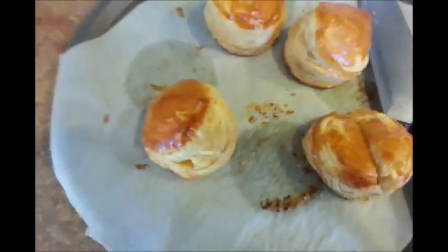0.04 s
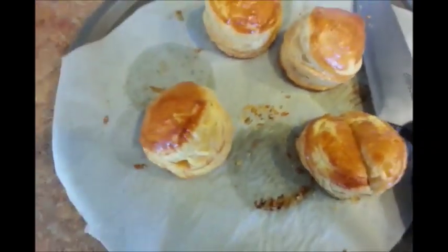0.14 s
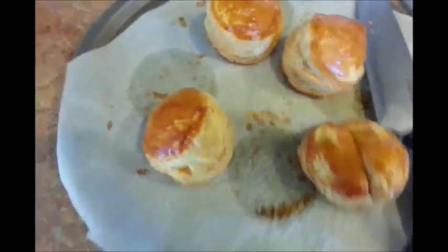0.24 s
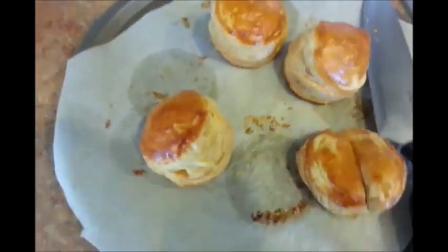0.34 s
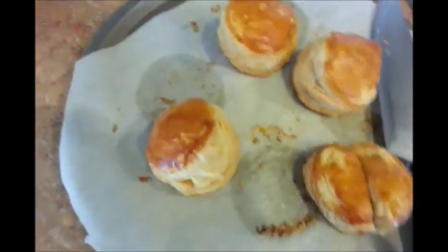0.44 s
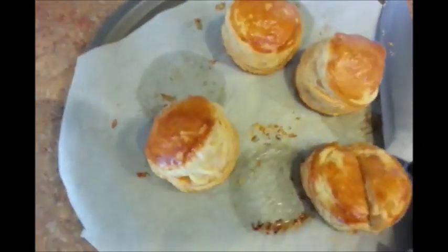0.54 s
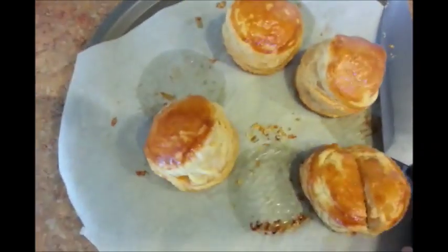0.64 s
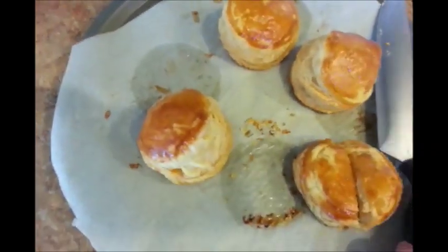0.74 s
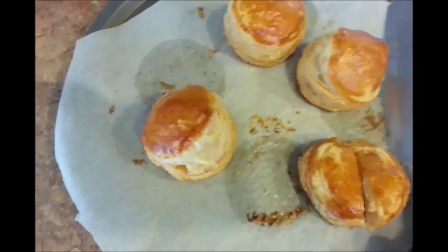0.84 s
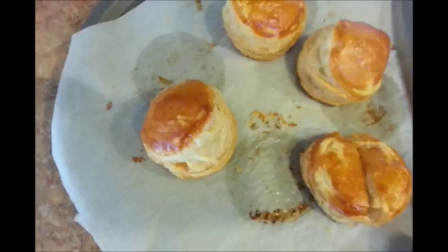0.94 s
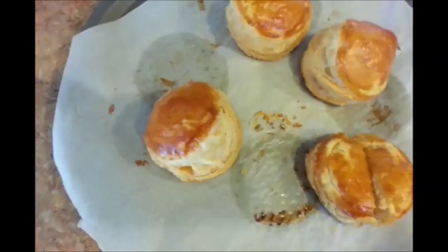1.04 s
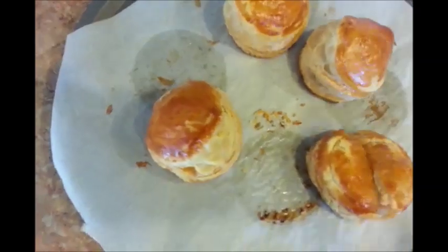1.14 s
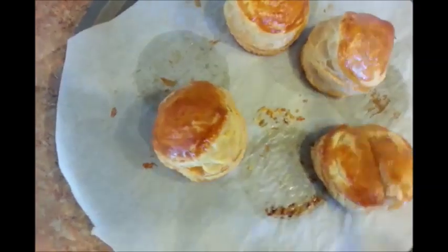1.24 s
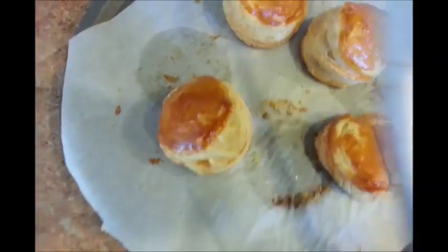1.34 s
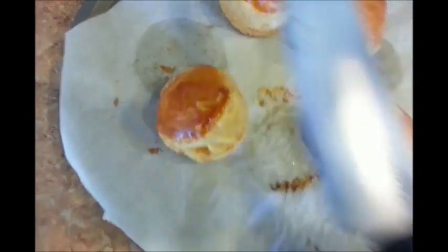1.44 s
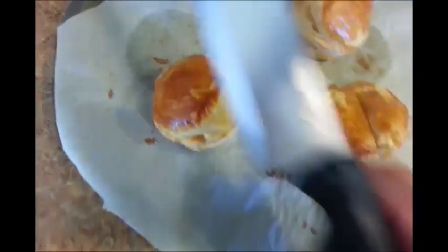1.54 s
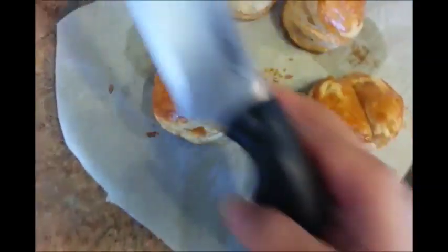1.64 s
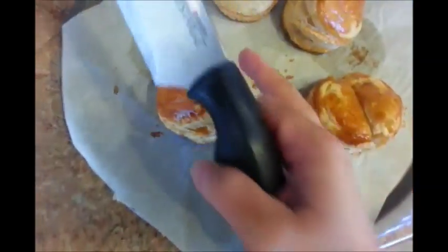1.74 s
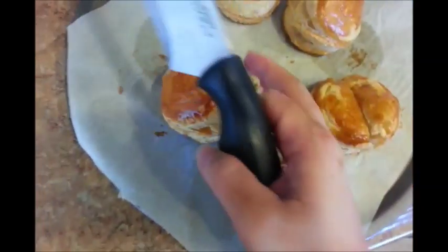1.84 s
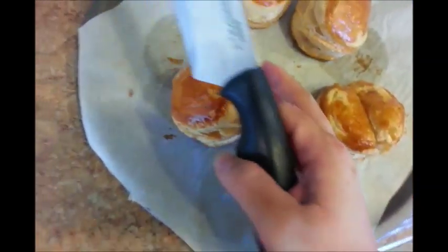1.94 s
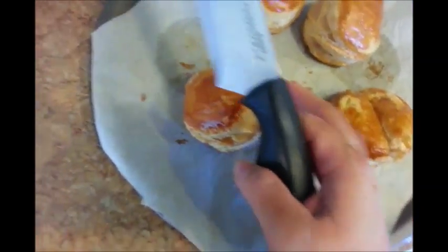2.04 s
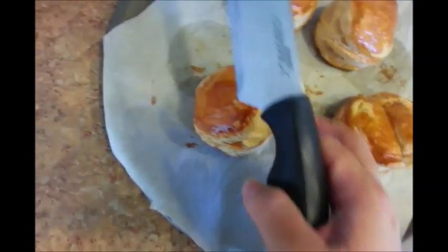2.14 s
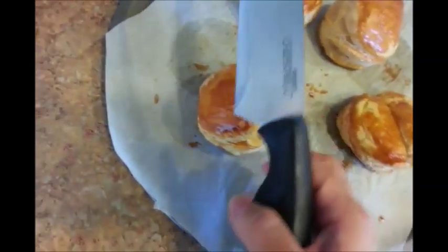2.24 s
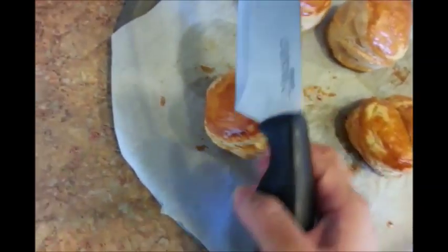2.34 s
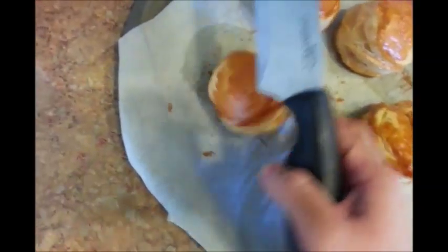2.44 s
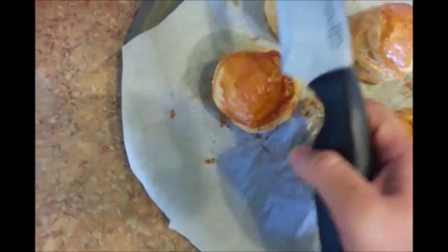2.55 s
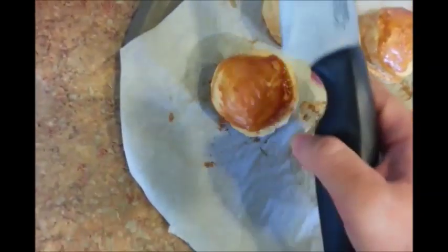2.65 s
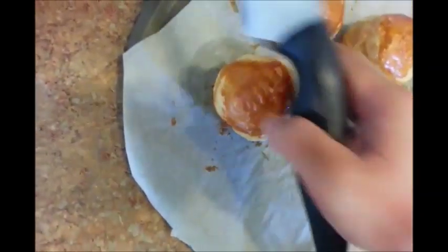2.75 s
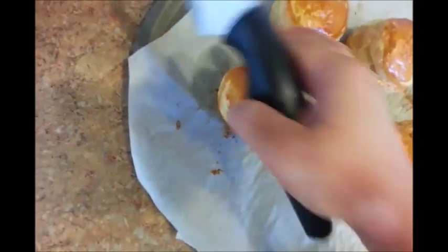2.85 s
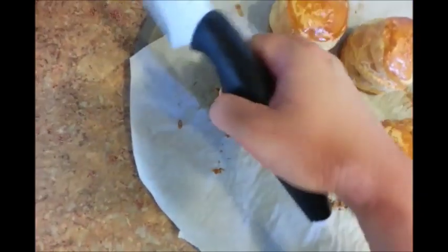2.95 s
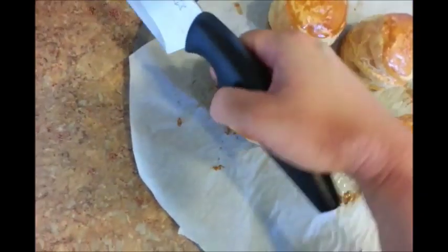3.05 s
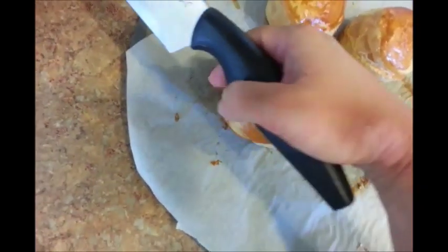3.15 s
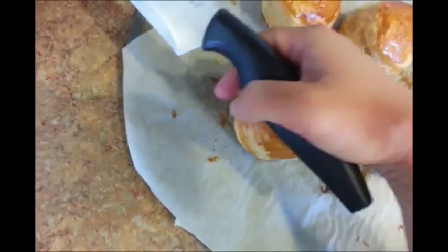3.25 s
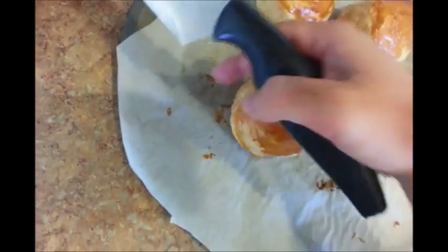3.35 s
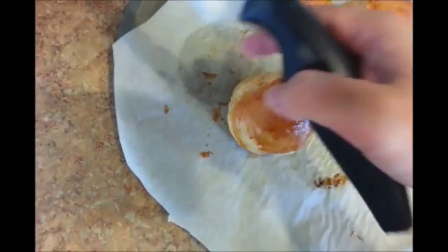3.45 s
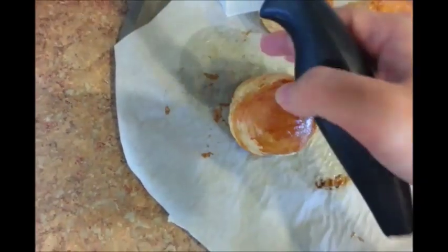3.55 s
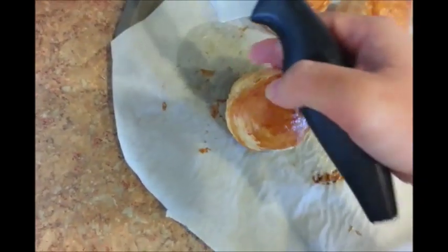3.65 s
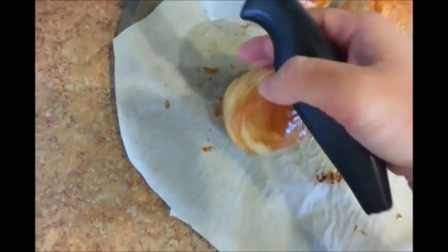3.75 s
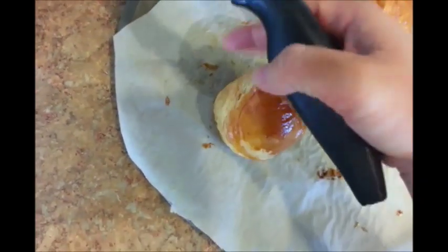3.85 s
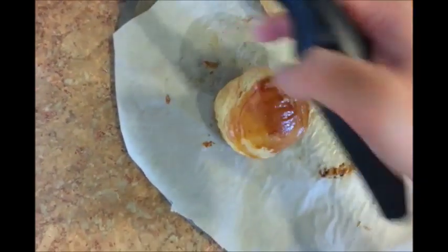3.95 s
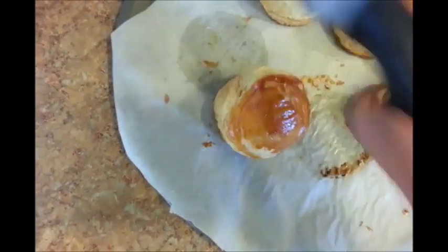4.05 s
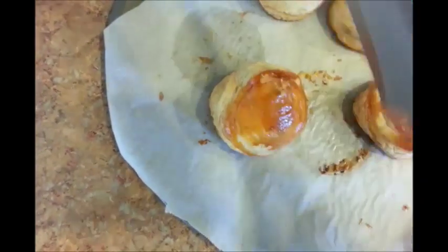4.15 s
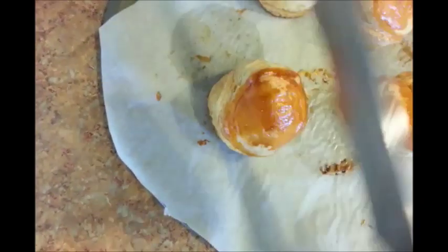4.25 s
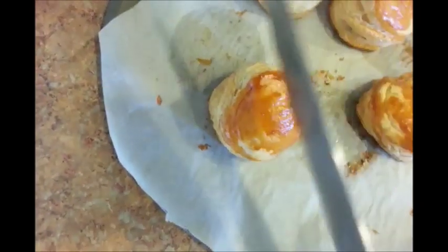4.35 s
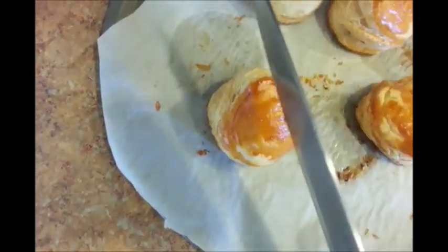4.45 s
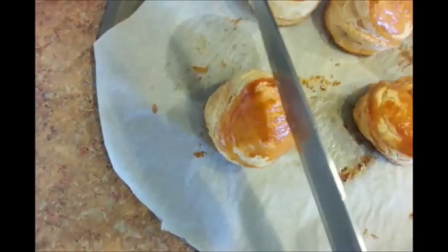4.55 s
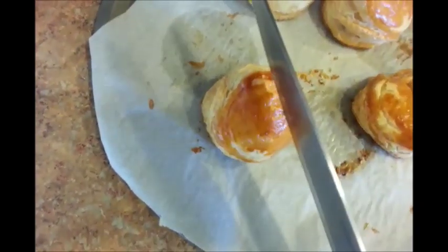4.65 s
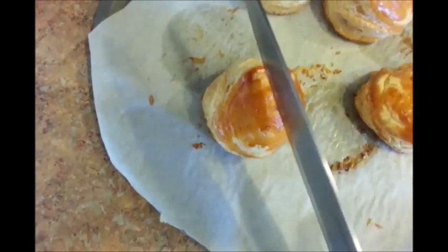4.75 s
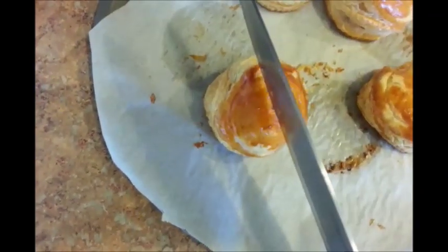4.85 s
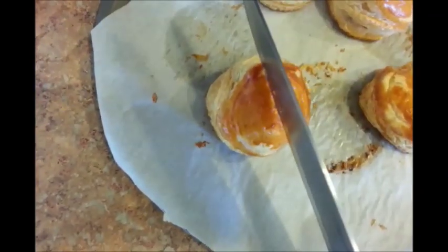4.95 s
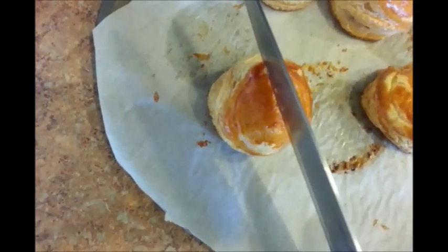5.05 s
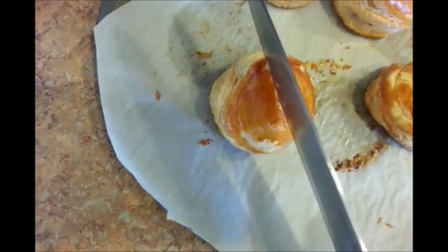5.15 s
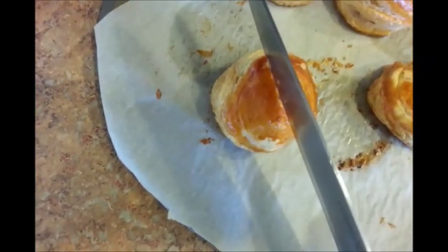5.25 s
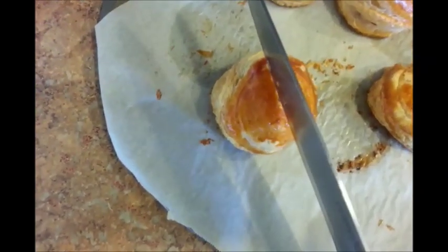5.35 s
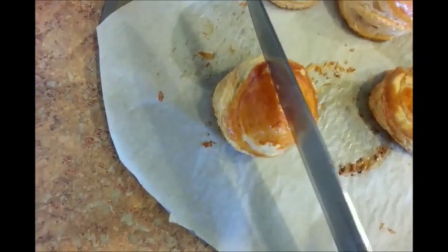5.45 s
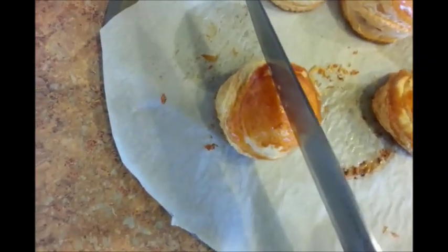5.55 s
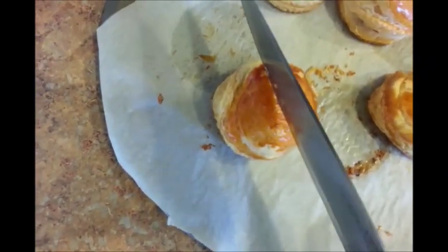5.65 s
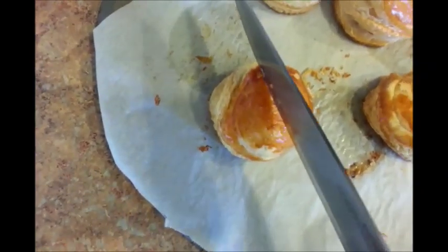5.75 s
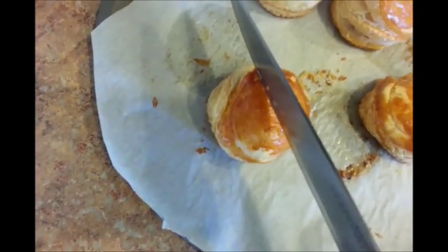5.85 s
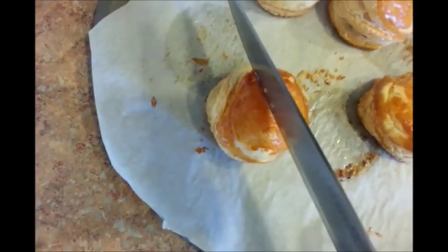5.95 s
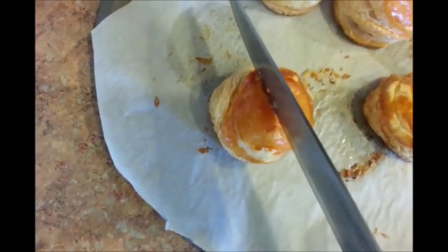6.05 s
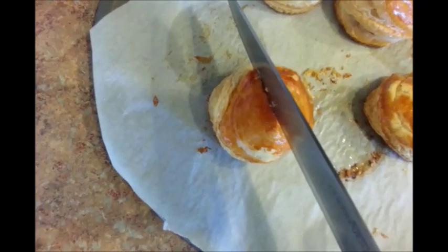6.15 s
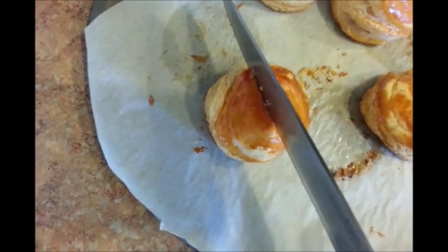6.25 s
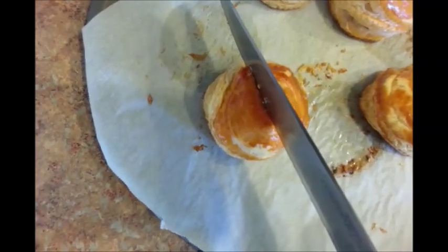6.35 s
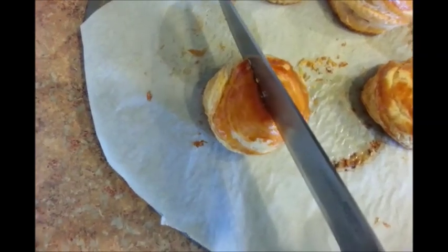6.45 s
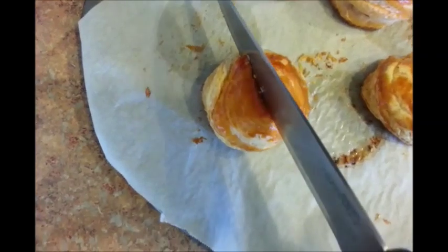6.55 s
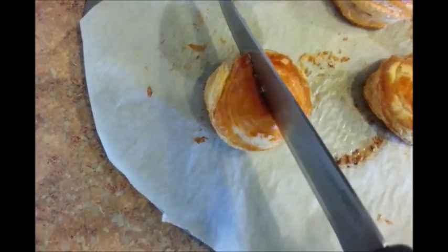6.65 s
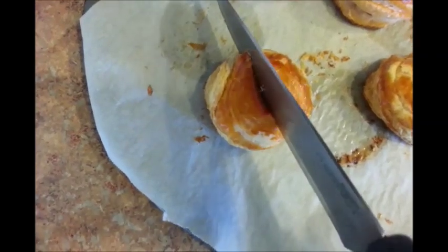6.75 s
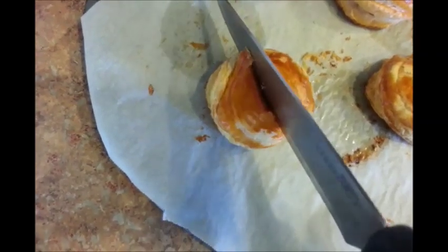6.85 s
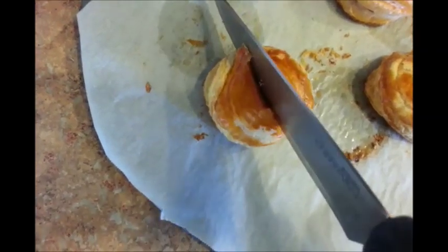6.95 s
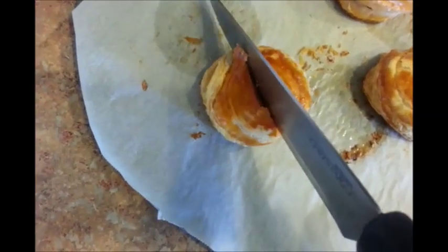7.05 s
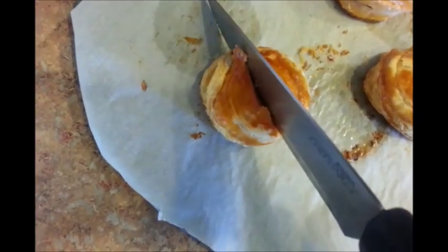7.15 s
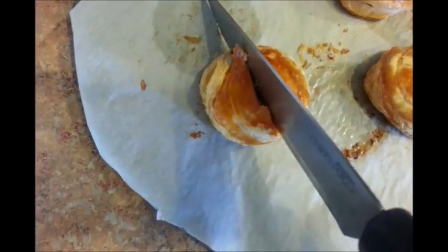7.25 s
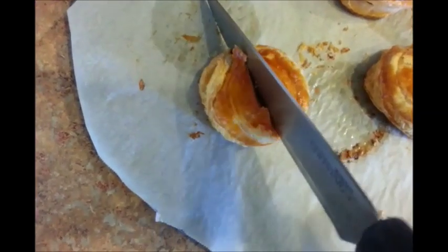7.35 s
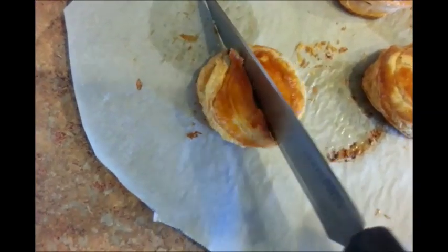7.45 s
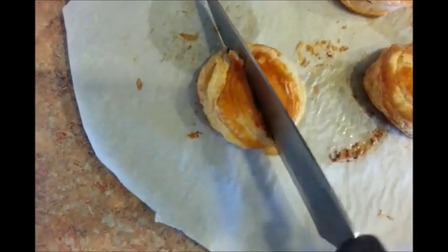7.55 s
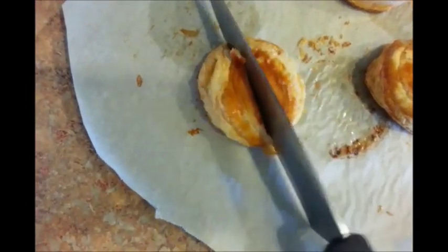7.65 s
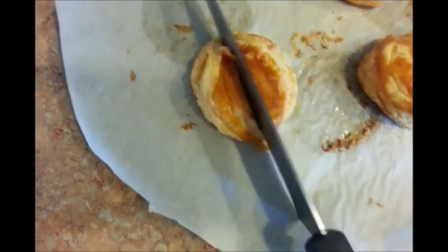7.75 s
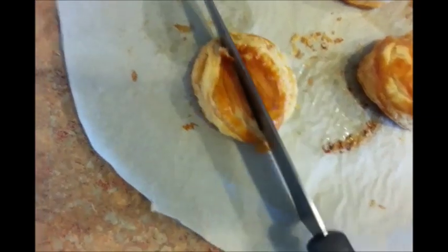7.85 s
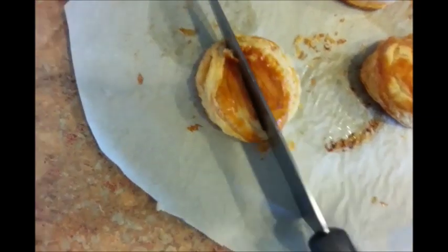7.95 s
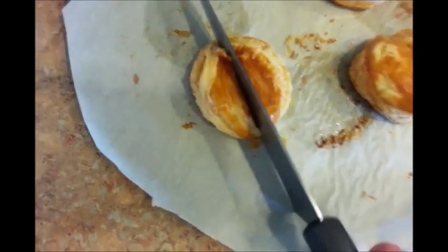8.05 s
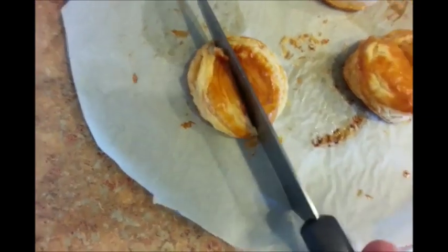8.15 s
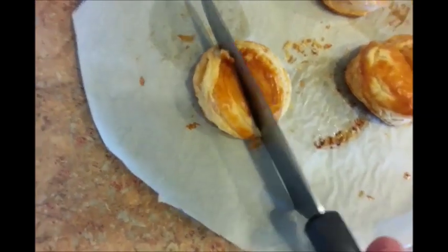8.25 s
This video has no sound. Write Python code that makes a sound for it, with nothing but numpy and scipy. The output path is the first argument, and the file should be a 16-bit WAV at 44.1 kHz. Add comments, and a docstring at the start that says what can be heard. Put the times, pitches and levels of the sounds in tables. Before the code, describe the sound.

Close handheld stereo sound, slightly noisy, with a short room tail. A steady appliance drone runs throughout. Tiny dry ticks and rubs come first, then a soft clink of a knife. A pastry scrapes hissily across crumby paper in three pushes, with a jangling tray rattle on the middle one. Later, fine crackling grows into loud crunches and snapping flakes, with a dull metallic thud as the blade comes through.

```python
"""Cutting puff pastry on a metal tray

In a small kitchen, an appliance hums behind: filtered noise plus a narrow, wavering low tone.
Fingers tick and rub on the camera, a knife is picked up, and a pastry is slid round in three pushes;
the second rattles the tray, whose metal sounds as a noisy clatter plus fading sine tones.
The blade then saws through the crust, made of thousands of tiny filtered clicks and single snaps,
and thumps down on the tray. Reflections and a short room tail follow the sounds on the tray.
"""
import sys
import numpy as np
from scipy import signal
from scipy.fft import rfft, irfft
from scipy.io import wavfile
from scipy.ndimage import uniform_filter1d

SR = 44100
rng = np.random.default_rng(int(sys.argv[2]) if len(sys.argv) > 2 else 0)


def file_out(sig):
    """Save sig as 16-bit WAV at sys.argv[1]."""
    # one column per channel
    cols = np.atleast_2d(sig).T
    # limit, then scale
    lim = np.clip(cols, -1, 1)
    pcm = np.round(lim * 32767).astype(np.int16)
    wavfile.write(sys.argv[1], SR, pcm)


N = 366471  # length in samples


def amp(db):
    """Turns decibels into a gain."""
    return 10 ** (np.asarray(db) / 20)


def unit(x):
    """Scales a signal to an rms of 1."""
    return x / np.sqrt(np.mean(x ** 2) + 1e-20)


def unit_mid(x):
    """Finds the rms of the middle (the left-right average) of a stereo sound."""
    return np.sqrt(np.mean(x.mean(0) ** 2) + 1e-20)


def read(points, hz):
    """Reads a table between its points, along a log-frequency axis."""
    f, value = np.transpose(points)
    return np.interp(np.log(hz + 1), np.log(f), value)


def add(mix, s, sound):
    """Mixes a stereo sound in at time s."""
    part = mix[:, max(round(s * SR), 0):][:, :sound.shape[1]]
    part += sound[:, :part.shape[1]]


def sides(pan_db):
    """Left and right gains whose mean is 1; left is pan_db louder than right."""
    gains = amp([[pan_db], [0]])
    return gains / gains.mean()


def equal_energy(x):
    """Scales each side of a stereo sound to an energy of 1."""
    return x / np.linalg.norm(x, axis=1, keepdims=True)


def bins(size=1024):
    """Frequencies of a short spectrum."""
    return np.fft.rfftfreq(size, 1 / SR)


def impulse(db):
    """The click that has this spectrum and puts its energy as early as possible (minimum phase)."""
    log_gain = np.log(amp(np.r_[db, db[-2:0:-1]]))
    return irfft(np.exp(np.conj(signal.hilbert(log_gain)))[:len(db)])


def flake(spectrum_db, own_db=10, octaves=0.15):
    """One fracture: the material's colour plus a resonance at a random pitch, as if set by its size."""
    own_hz = np.exp(rng.uniform(np.log(1800), np.log(13000)))
    resonance = np.exp(-(np.log2((bins() + 1) / own_hz) / octaves) ** 2)
    click = impulse(spectrum_db + own_db * resonance)
    return click / np.linalg.norm(click)


def tear(tear_s, size=400):
    """A crack runs through a flake: a noise burst that swells and dies within a few milliseconds."""
    u = np.arange(size) / SR / tear_s
    return equal_energy(rng.standard_normal((2, size)) * u * np.exp(-u))


def crackle(spectrum, pan_db, per_s, spread_db, clump_db, clump_s, tear_s=0, count=24):
    """A steady stream of tiny fractures in clumps; each of the count kinds has its own pitch and place."""
    drift = unit(uniform_filter1d(rng.standard_normal(N), max(int(clump_s * SR), 1)))
    clumps = amp(clump_db * np.minimum(drift, 1))
    out = np.zeros((2, N))
    for _ in range(count):
        size = amp(spread_db * np.minimum(rng.exponential(1, N), np.e)) * rng.choice([-1, 1], N)
        happens = rng.random(N) < per_s / count / SR
        grain = flake(read(spectrum, bins()))
        if tear_s:
            grain = np.convolve(grain, tear(tear_s)[0])
        grains = signal.oaconvolve(size * clumps * happens, grain)[:N]
        lag = rng.integers(-2, 7)  # the two sides hear it a few samples apart
        out += [np.roll(grains, lag), grains]
    out *= sides(pan_db)
    return out / unit_mid(out)


def effort(rows):
    """Gain over time from a level curve, silent outside it."""
    s, db = np.transpose(rows)
    return amp(np.interp(np.arange(N) / SR, s, db, left=-np.inf, right=-np.inf))


def pushes(rows, curve, stop_db_per_s):
    """Gain over time of hand movements: each builds up (curve 1 = straight), holds and dies away."""
    t, power = np.arange(N) / SR, np.zeros(N)
    for start, attack_s, hold_s, db in rows:
        build = np.clip((t - start) / attack_s, 0, 1) ** curve
        fade_db = np.clip(stop_db_per_s * (t - start - attack_s - hold_s), 0, 120)
        power += (build * amp(db - fade_db)) ** 2
    return np.sqrt(power)


def waver(depth_db, patch_hz, patch_s, above_hz, size=1024):
    """Gains by frequency and frame that drift in patches; the deepest bass stays steady."""
    field = rng.standard_normal((size // 2 + 1, N * 4 // size + 8))
    field = uniform_filter1d(field, max(int(patch_hz * size / SR), 1), 0)
    field = unit(uniform_filter1d(field, max(int(patch_s * SR * 4 / size), 1), 1))
    return amp(depth_db * field * np.clip(bins(size) / above_hz, 0, 1)[:, None] ** 2)


# colour of the kitchen's background noise: (f/Hz, relative level/dB)
AIR_COLOUR = [(20, -25.5), (42, -19.5), (71, -17.5), (158, -8.5), (197, -2), (252, -10), (426, -15.5),
              (503, -15), (719, -18), (974, -17), (1250, -25.5), (2110, -25.5), (3460, -35), (4080, -36),
              (5230, -37), (7910, -36.5), (14500, -45.5)]
# how alike left and right are in the background: (f/Hz, likeness 0-1)
AIR_LIKENESS = [(30, 0.6), (200, 0.79), (1000, 0.05), (3000, 0), (14000, 0)]
# the upper midrange of the background: (t/s, level change/dB)
AIR_MIDRANGE = [(.6, -3.5), (1.2, -0.5), (2.1, -4.5), (2.8, -0.5), (4.6, 0), (5.3, 2.5)]
# slow swell of the background noise: (t/s, level change/dB)
AIR_SWELLING = [(0, -2), (2.199, -1.5), (4.3, 0), (5.2, 3.5), (8.3, 2.5)]


def background(hum_hz=194, hum_width_hz=3, hum_db=-52.5, mids_hz=2300, air_db=-49.5):
    """An appliance fan: soft, unevenly rushing air (shaped noise) and one wavering low tone."""
    hz = np.fft.rfftfreq(N, 1 / SR)
    a, b, c = rfft(rng.standard_normal((3, N)))
    same = np.clip(read(AIR_LIKENESS, hz), 0, 1)
    right = same * a + np.sqrt(1 - same ** 2) * b
    air = irfft(np.array([a, right]) * amp(read(AIR_COLOUR, hz)), N)
    # the level changes by frequency and over time, frame by frame
    band_hz, frame_s, z = signal.stft(air, SR, nperseg=1024, noverlap=768)
    mids = np.exp(-np.log2((band_hz + 1) / mids_hz) ** 2 / 2)
    z = z * amp(np.outer(mids, np.interp(frame_s, *np.transpose(AIR_MIDRANGE))))
    z = z * waver(depth_db=2.34, patch_hz=180, patch_s=.15, above_hz=340)[:, :z.shape[2]]
    air = signal.istft(z, nperseg=1024, noverlap=768)[1][:, :N]
    # noise in a very narrow band sounds like a wavering tone
    hum = unit(irfft(c / (1 + ((hz - hum_hz) / hum_width_hz) ** 2), N))
    swell = amp(np.interp(np.arange(N) / SR, *np.transpose(AIR_SWELLING)))
    return swell * amp(air_db) * air / unit_mid(air) + amp(hum_db) * hum


# how long the kitchen's tail takes to fall by 60 dB: (f/Hz, t60/s)
ROOM_DECAY = [(150, 0.89), (1000, 0.39), (4000, 0.36), (8000, 0.064), (14000, 0.16)]


def kitchen(x, early_db=-15, tail_db=-20):
    """Quick reflections off tray and counter, then the short tail of the room, as decaying noise."""
    noise = rng.standard_normal((2, SR // 2))
    t = np.arange(SR // 2) / SR
    early = noise * np.exp(-t / .005) * (t > .001)
    early *= amp(early_db) / np.linalg.norm(early[1])
    hz, frame_s, z = signal.stft(noise * (t > .005), SR, nperseg=256)
    decay = amp(-60 * frame_s / read(ROOM_DECAY, hz)[:, None])
    tail = signal.istft(z * decay, SR, nperseg=256)[1][:, :len(t)]
    tail *= amp(tail_db) / np.linalg.norm(tail[1])
    return signal.fftconvolve(x, early + tail, axes=1)[:, :N]


def sharp_click(colour_db, pan_db, splinter_db, splinter_s, size=600):
    """One sharp click followed by a millisecond or two of splinters."""
    decay = np.exp(-np.arange(size) / SR / splinter_s)
    force = amp(splinter_db) * rng.standard_normal((2, size)) * decay
    force[:, 0] = 1
    click = signal.fftconvolve(force, flake(colour_db, own_db=2.5)[None], axes=1)
    return sides(pan_db) * equal_energy(click)


# fingers ticking on the camera body: (t/s, relative level/dB, left over right/dB)
FINGER_TICKS = [(0.1188, -13.5, -7), (0.186, -5, 5), (0.2236, -10.5, -18), (0.2353, -23, 6),
                (0.2479, -7, 12), (0.258, -20, 13), (0.264, -19, 12), (0.2772, -10, 12), (0.2914, -26, 1)]
# colour of skin on the camera body: (f/Hz, relative level/dB)
CAMERA_COLOUR = [(200, -10.5), (1200, -12.5), (2500, -10), (4600, -4.5), (6000, -2.5), (7600, 2.5),
                 (9500, -8), (14500, -20)]


def ticks(late_s=0.0015, gain_db=10.5):
    """Very short clicks, too close to the microphone to stir the room."""
    out = np.zeros((2, N))
    for s, db, pan_db in FINGER_TICKS:
        click = sharp_click(read(CAMERA_COLOUR, bins()), pan_db, splinter_db=-7, splinter_s=.0008)
        add(out, s + late_s, amp(db + gain_db) * click)
    return out


# a fingertip rubbing on the camera body: (start t/s, build-up t/s, steady t/s, level/dB)
FINGER_RUBS = [(.177, .003, 0.0079, -39.5), (.25, 0.011, 0.015, -35.5)]


def rubbing():
    """Skin sticks and slips on the camera body between the ticks: a dense stream of tiny clicks."""
    grit = crackle(CAMERA_COLOUR, 2.4, per_s=2100, spread_db=1.5, clump_db=2.0, clump_s=.003, count=6)
    return pushes(FINGER_RUBS, curve=0.84, stop_db_per_s=1100) * grit


# the knife scraping and clinking as it is picked up: (t/s, relative level/dB, contact decay t/s)
KNIFE_CLINKS = [(.655, -36, 0.015), (.86, -41.5, 0.17), (.935, -30, 0.03), (1.008, -11.5, 0.014),
                (1.041, -25, 0.026)]
# the tones the blade can ring at: (f/Hz, width f/Hz, relative level/dB)
BLADE_MODES = [(1730, 150, -8.5), (2224, 30, -2.5), (2540, 190, -10.5), (3968, 25, 1.5), (4250, 120, -3),
               (4840, 40, 0), (5130, 27, -0.5), (5892, 34, 2), (7560, 31, 8.5)]


def blade(ring_db=-1, scrape_hz=900, rub_db=-65, rub_hz=2500, grip_width_hz=130):
    """The knife scrapes and clinks off the tray, then sings faintly when rubbed, damped by the grip."""
    hz, t = np.fft.rfftfreq(N, 1 / SR), np.arange(N) / SR
    free = sum(amp(db) / (1 + 2j * (hz - f) / width) for f, width, db in BLADE_MODES)
    # the hand widens every resonance, so it rings for less time
    gripped = sum(amp(db) * width / (width + grip_width_hz + 2j * (hz - f))
                  for f, width, db in BLADE_MODES)
    scrape = amp(read(CLATTER_COLOUR, hz)) * hz / (hz + scrape_hz)
    contact = sum(amp(db) * (t > s) * np.exp(-abs(t - s) / decay_s) for s, db, decay_s in KNIFE_CLINKS)
    rub = amp(rub_db) * np.interp(t, [1.15, 1.8, 2.05, 2.2], [0, 1, 1, 0])
    noise = rng.standard_normal((2, N))
    ringing = free / np.sqrt(np.mean(abs(free) ** 2))
    clinks = rfft(contact * noise) * (unit(scrape) + amp(ring_db) * ringing)
    singing = rfft(rub * noise) * unit(abs(gripped) / (1 + hz / rub_hz))
    return sides(-1.5) * irfft(clinks + singing, N)


# soft bumps of pastry and hand on the tray; the last row is the tray's deepest tone after the blade thumps
# down: (t/s, relative level/dB, f/Hz)
LOW_BUMPS = [(.685, -33.5, 280), (0.77, -36, 230), (1.013, -30.5, 250), (3.053, -25, 282),
             (4.968, -35, 340), (7.056, -35, 314), (7.165, -25.5, 282), (7.66, -33, 332), (7.78, -30, 307),
             (7.956, -17.5, 314), (7.983, -23, 88.5)]


def bumps(rise_s=0.0023, decay_s=.017):
    """Something soft pushes the tray, or the blade's thump sets the tray's deepest tone going: a few damped low
    cycles."""
    out, t = np.zeros((2, N)), np.arange(SR // 2) / SR
    envelope = (1 - np.exp(-t / rise_s)) * np.exp(-t / decay_s)
    for s, db, hz in LOW_BUMPS:
        add(out, s, amp(db) * sides(0) * np.sin(2 * np.pi * hz * t) * envelope)
    return out


# the tones the tray rings at: (f/Hz, relative level/dB, t60/s)
TRAY_MODES = [(370, -14, .25), (423, -15, .25), (557, -18, .3), (653, -15, .3), (689, -10, .35),
              (737, -13, .45), (920, -11, .4), (1189, -13, .5), (1835, -5, .8), (2020, -6, .22),
              (2410, -7, .2), (3079, -11, .16), (4185, -3, .2), (4826, -8, .22), (5118, -3, .35),
              (5215, -1, .35), (5274, -2, .3), (6514, 0, .3), (6983, 3, .25), (7448, -5, .3),
              (7907, -4, .3)]
# colour of metal clatter, also used by the knife's scrape: (f/Hz, relative level/dB)
CLATTER_COLOUR = [(50, -27.5), (100, -8), (200, -11), (330, -3.5), (520, -9.5), (720, -9), (1050, -6.5),
                  (1400, -7.5), (2100, -5), (3000, -4), (5000, -6), (7600, -2), (10000, -14),
                  (15000, -26.5)]
# blows on the tray: (t/s, relative level/dB, brightness/dB per octave, clatter decay t/s,
# relative ringing level/dB, left over right/dB, mode favoured by the spot struck f/Hz)
TRAY_BLOWS = [(3.050, -10.5, 3, 0.014, -1, -4.5, 6983), (3.089, -17, 3.5, 0.013, 2, -4, 2020),
              (3.111, -14, 1.5, 0.01, 1.5, 0.5, 2410), (3.14, -21.5, 5.5, 0.0066, -8, -12, 7900),
              (3.163, -23.5, 4, 0.015, 11, -8, 3079), (3.18, -21, 3.5, 0.029, 6.5, -1.5, 5240),
              (5.737, -25.5, -10.5, 0.0043, -30, -18, 690), (7.337, -14, -1, 0.0014, -24, 3, 1189),
              (7.957, -7.5, -10.5, 0.0062, 0.5, 1.5, 370), (7.978, -14, -7, 0.047, 1, 1.5, 920),
              (7.999, -19, -6, 0.027, 0.5, -5.5, 1835)]


def tray(buzz_db=-25, buzz_s=0.1, modes_db=-22.0, spot_db=11, spot_octaves=0.055):
    """Each blow clatters the sheet metal and leaves its modes ringing; its brightness is its own."""
    out, t = np.zeros((2, N)), np.arange(SR // 2) / SR
    hz, mode_db, t60 = np.transpose(TRAY_MODES)[:, :, None]
    # while the metal is still in contact, its modes are damped into broad peaks that colour the clatter
    peak_shape = 1 + ((bins(4096) - hz) / (15 + .012 * hz)) ** 2
    peaks_db = (np.where(hz < 1500, 6, 9) / peak_shape).max(0)
    clatter = impulse(read(CLATTER_COLOUR, bins(4096)) + peaks_db)
    clatter /= np.linalg.norm(clatter)
    for s, db, tilt_db, crack_s, ring_db, pan_db, spot_hz in TRAY_BLOWS:
        decay = np.exp(-t / crack_s) + amp(buzz_db) * np.exp(-t / buzz_s)
        contact = rng.standard_normal((2, len(t))) * decay
        rattle = signal.fftconvolve(contact, clatter[None], axes=1)[:, :len(t)]
        # the higher the mode, the more its phase differs between left and right
        phase = rng.uniform(0, 2 * np.pi, hz.shape)
        phase = phase + rng.standard_normal((2, len(hz), 1)) * np.minimum(hz / 1500, 2)
        favoured_db = spot_db * np.exp(-(np.log2(hz / spot_hz) / spot_octaves) ** 2)
        mode_gain = amp(mode_db + favoured_db - 60 * t / t60)
        ring = (mode_gain * np.sin(2 * np.pi * hz * t + phase)).sum(1)
        blow = sides(pan_db) * (rattle + amp(modes_db + ring_db) * ring)
        # long waves reach both sides alike
        blow[0] += signal.lfilter(*signal.butter(1, 600, fs=SR), blow[1] - blow[0])
        hardness = impulse(tilt_db * np.log2(np.maximum(bins(), 1100) / 2000))
        add(out, s, amp(db) * signal.fftconvolve(blow, hardness[None], axes=1))
    return out


# pastry, hand and knife pushed over parchment: (start t/s, speeding up t/s, steady t/s, relative level/dB)
PARCHMENT_SLIDES = [(.635, 0.017, 0.0037, -46.5), (.74, 0.013, .004, -51), (.8, 0.049, 0.1, -43),
                    (.92, 0.014, 0.05, -33), (1.1, 0.026, 0.027, -50), (1.2, 0.071, 0.039, -52),
                    (1.38, 0.068, 0.06, -52.5), (2.25, 0.099, .02, -52), (2.406, 0.046, .11, -19),
                    (3.05, 0.22, 0.046, -17), (3.705, 0.14, 0.027, -20), (4.07, 0.096, 0.044, -46.5)]
# colour of crumbs on parchment: (f/Hz, relative level/dB)
PAPER_COLOUR = [(100, -41.5), (600, -40.5), (1000, -31.5), (1700, -17.5), (4000, -17.5), (6000, -8),
                (7100, -3), (7800, 0), (9000, -11.5), (11000, -11), (14500, -15)]


def sliding():
    """Crumbs catch on the parchment so densely that they merge into a grainy hiss."""
    speed = pushes(PARCHMENT_SLIDES, curve=1.48, stop_db_per_s=340)
    hiss = crackle(PAPER_COLOUR, pan_db=-11, per_s=9400, spread_db=-2.0, clump_db=2, clump_s=0.016)
    return amp(-1.0) * speed * hiss


# single flakes and paper creases snapping: (t/s, relative level/dB, left over right/dB, low part level/dB)
FLAKE_SNAPS = [(2.2743, -18.5, -2, 23), (2.322, -21.5, -2.5, 35), (2.4108, -10, -16, -36),
               (3.6962, -12, -6, -10), (3.711, -11.5, -12, -14), (3.751, -13, -6, -9),
               (3.783, -1.5, -3, -3), (3.8988, -9, -10, -7.5), (4.9686, -26, -8.5, 10),
               (5.015, -19.5, -6, -4.5), (5.111, -15, -3, 5), (5.138, -13, -7, -7), (5.228, -12, -5, 8),
               (5.2936, -16, -12, 11), (5.461, -18, 1, 10), (5.656, -9.5, -1, 5), (5.682, -12, 2, 3),
               (5.7416, 1.5, -2, -4), (6.343, -5, -9, -37), (6.4253, -10.5, -2, 2), (6.4395, -9, -7, -5),
               (6.4717, -12, -12, 4), (6.4822, -7, -5, 2), (6.5133, -7, -7, -7), (6.5532, -6.5, -6, 2),
               (6.5652, -4, -7, -10), (6.6239, -8.5, -3, 13), (6.6707, -12, 3, -5), (6.6854, -10.5, -4, 10),
               (6.8541, 2, 1, 3), (7.009, -7.5, -3, 4), (7.077, -1, 8, 11), (7.094, -2.5, -9, 8),
               (7.105, 1, -3, 4), (7.2442, -5.5, -2, -2), (7.3308, -3.5, -3.5, 25), (7.434, -6, -5, -9),
               (7.6011, -3, -9, 2), (7.6233, 0.5, -1, -9), (7.7399, 2.5, -10, -30), (7.7894, 5, 8, -6),
               (7.7932, 5.5, -15, -12), (7.8577, 3, -1, -8), (7.8974, 1, -7, -10), (7.9301, -2.5, -7, -7),
               (7.9451, 6, -2, 6), (8.077, -1, 0, -22), (8.143, 2.5, -13, -32), (8.16, 4.5, -6.5, -9),
               (8.268, 4, 1, -54.5)]


def snaps(low_hz=3500, tear_s=0.00048, late_s=0.00093, gain_db=5.5):
    """Larger flakes break one by one, each with its own pitch; more low part makes one sound thicker."""
    out = np.zeros((2, N))
    for s, db, pan_db, low_db in FLAKE_SNAPS:
        colour = read(CRUST_COLOUR, bins()) + low_db / (1 + (bins() / low_hz) ** 2)
        crack = signal.fftconvolve(tear(tear_s), flake(colour, own_db=11)[None], axes=1)
        add(out, s + late_s, amp(db + gain_db) * sides(pan_db) * equal_energy(crack))
    return out


# colour of breaking crust, also used by the single snaps: (f/Hz, relative level/dB)
CRUST_COLOUR = [(100, -26), (300, -13.5), (550, -34), (1000, -18.5), (2000, -13.5), (4000, -9),
                (6000, -5.5), (7400, 1), (8100, -1), (9300, -10), (11000, -11), (14500, -13.5)]
# strokes of the blade through the crust: (start t/s, bearing down t/s, steady t/s, relative level/dB)
BLADE_STROKES = [(5.73, 0.0064, 0.0042, -30), (5.96, 0.07, 0.023, -25), (6.15, 0.013, 0.02, -36),
                 (6.4, 0.32, 0.19, -31), (7.005, 0.032, 0.066, -23), (7.1, 0.044, 0.016, -19.5),
                 (7.37, 0.089, 0.099, -23.5), (7.615, 0.012, 0.067, -21.5), (7.7, 0.022, 0.12, -28),
                 (7.942, 0.0029, 0.056, -20), (8.08, 0.009, 0.085, -29.5), (8.265, 0.0034, 0.0075, -29)]
# the blade's steady weight, first on the glaze, then in the crust: (t/s, relative level/dB)
BLADE_WEIGHT = [(4.96, -54), (5.34, -60), (5.43, -42), (5.85, -42.5), (6.5, -40.5), (7.3, -38.5),
                (8.31, -37.5)]


def cutting(pan_db=-10):
    """The blade's teeth rasp finely while thin layers break in sparser crackles."""
    rasp = crackle(CRUST_COLOUR, pan_db, per_s=2400, spread_db=-1.0, clump_db=4.0, clump_s=.012)
    breaks = crackle(CRUST_COLOUR, pan_db, per_s=170, spread_db=4.5, clump_db=6, clump_s=0.013,
                     tear_s=0.00028)
    strokes = pushes(BLADE_STROKES, curve=0.56, stop_db_per_s=333)
    force = np.hypot(effort(BLADE_WEIGHT), strokes)
    # single breaks stand out under a light stroke and sink into the rasp under a hard one
    break_force = force / np.sqrt(1 + force / amp(-41.5))
    return amp(-0.5) * force * rasp + amp(-1.5) * break_force * breaks


def scene():
    """Everything on the tray with its room sound, plus the camera touches and the background."""
    near = bumps() + blade() + tray() + sliding() + snaps() + cutting()
    return background() + kitchen(near) + ticks() + rubbing() + near


def record(dry, bass_hz=45, edge_hz=14700):
    """The small microphone loses deep bass, peaks are cut at full scale, then the top treble is removed."""
    high_passed = signal.lfilter(*signal.butter(2, bass_hz, "high", fs=SR), dry)
    limited = np.clip(high_passed, -1, 1)
    treble_cut = signal.firwin(201, edge_hz, window=("kaiser", 7), fs=SR)
    return signal.oaconvolve(limited, treble_cut[None], "same")


dry = scene()
out = record(dry)
file_out(out)
```